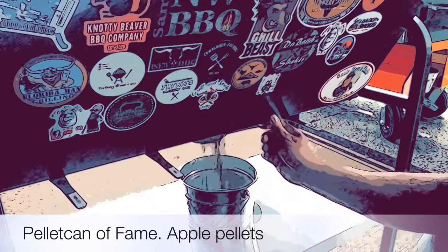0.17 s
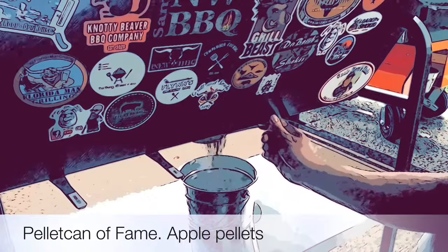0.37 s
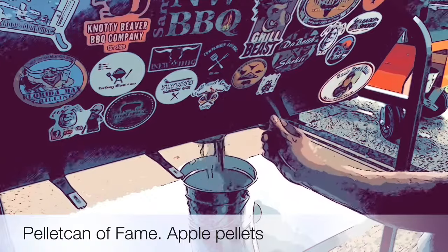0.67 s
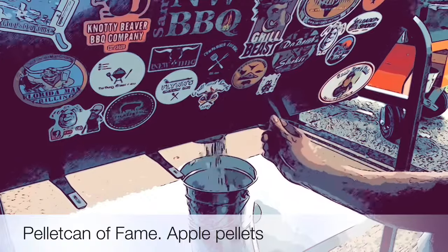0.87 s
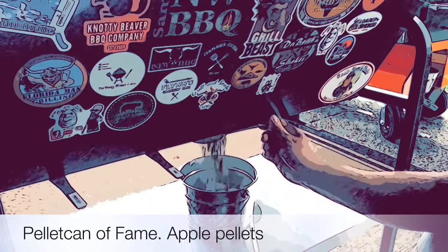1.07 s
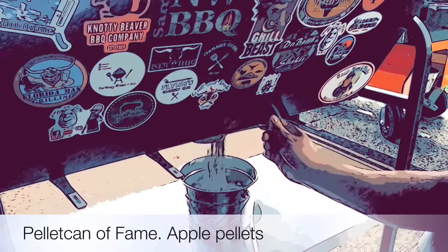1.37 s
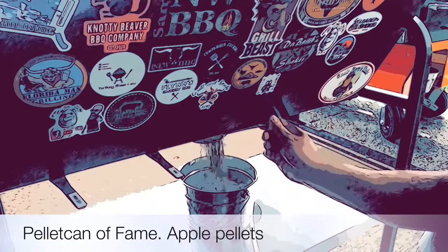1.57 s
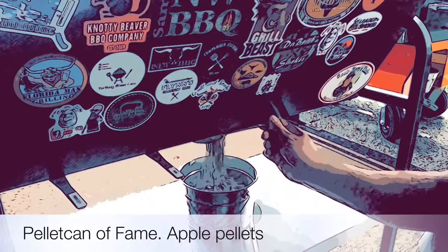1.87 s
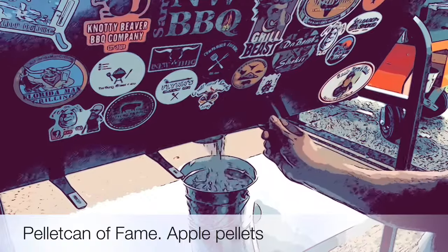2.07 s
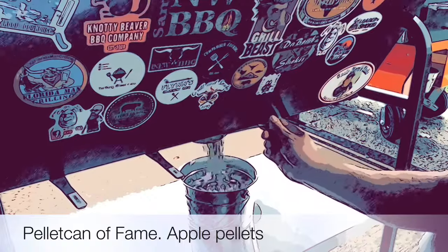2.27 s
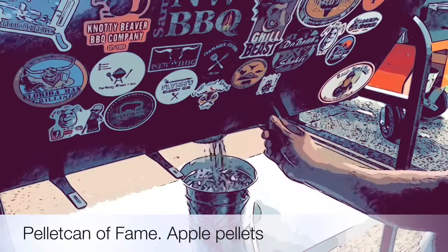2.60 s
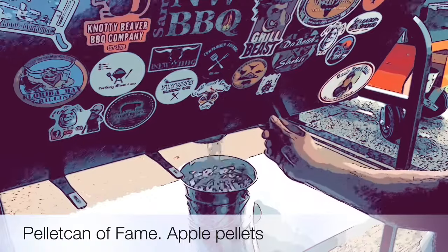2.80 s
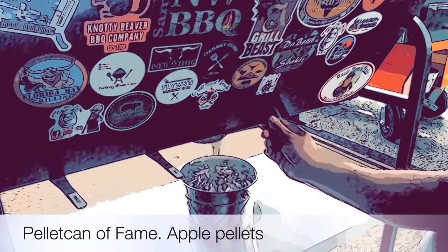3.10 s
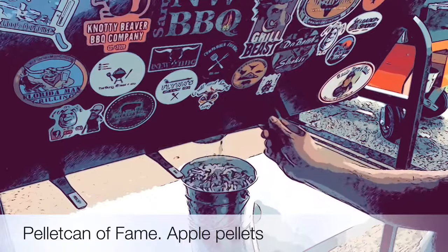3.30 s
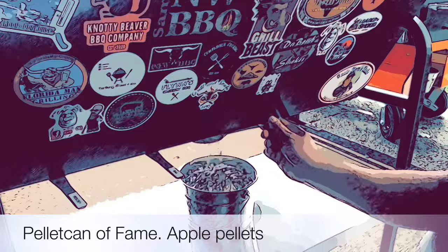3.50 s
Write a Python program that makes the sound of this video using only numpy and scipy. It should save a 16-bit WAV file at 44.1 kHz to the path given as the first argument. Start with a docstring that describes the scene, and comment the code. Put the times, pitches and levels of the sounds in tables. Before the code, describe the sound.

Close up outdoors, dry wood pellets drum on the bare floor of a sheet-metal can, then patter onto their own growing heap, ending in separate ticks with small rim rings and a soft low hum.

```python
"""Wood pellets poured into a metal can

Wood pellets pour from a chute into a sheet-metal can, close to a microphone that overloads at first.
The dense patter (random taps and short bursts of noise) thins out as the can fills. Louder pellets crack
singly (fading noise) and ring the rim; the wall and floor of the can answer with dying tones.
Faint, low outdoor noise lies underneath.
"""
import sys
import numpy as np
from scipy import signal
from scipy.fft import rfft, irfft, next_fast_len
from scipy.io import wavfile
from scipy.ndimage import uniform_filter1d

SR = 44100
rng = np.random.default_rng(int(sys.argv[2]) if len(sys.argv) > 2 else 0)


def ratio(d):
    """dB to gain"""
    e = np.asarray(d, float) / 20
    return 10 ** e


def store_pcm(level_fs):
    """Save levels as 16-bit WAV."""
    pcm = np.round(np.clip(level_fs, -1, 1) * 32767).astype(np.int16)
    wavfile.write(sys.argv[1], SR, np.atleast_2d(pcm).T)


N = 160965  # length in samples

# How the pouring goes: (time [s], patter level [dB], can body level [dB], brightness [0-1])
POURING = [(0, 0.5, -8.5, 0.37), (.12, -12.5, -16, 0.1), (.2, -14, -20.5, 0.06), (.31, -15.5, -22.5, 0.4),
           (.41, -19, -28, 0.11), (.55, -14, -26, 0.16), (.8, -18.5, -30.5, 0.4),
           (1.05, -19.5, -33.5, 0.48), (1.4, -21, -38.5, 0.55), (1.8, -22.5, -38.5, 0.52),
           (2.2, -28, -46.5, 0.58), (2.7, -30.5, -42.5, 0.42), (3.1, -33.5, -48.5, 0.53),
           (3.45, -36, -47.5, 0.54), (3.65, -41.5, -59, 0.2)]
# Basic tone colour of a crackling pellet: (frequency [Hz], relative level [dB per Hz])
PELLET_COLOUR = [(290, -36), (500, -23), (1930, -11.5), (3330, -2), (4900, -3.5), (8850, -2), (10200, -0.5),
                 (15500, -1.5)]
PATCHY_DB = 3.5  # typical unevenness of a burst's spectrum
BOUNCE_DB = 3.5  # typical unevenness of a sound's loudness over time


def evened(x):
    """Scales x to an average strength (rms) of 1."""
    return x / np.sqrt(np.mean(x ** 2) + 1e-20)


def spectrum_at(points, hz):
    """Reads a spectrum table at hz, along a logarithmic frequency scale."""
    table_hz, value = np.transpose(points)
    return np.interp(np.log(hz + 1), np.log(table_hz + 1), value)


def colour(x, points, centre_hz=None):
    """Filters x by a spectrum table, with an extra hump around centre_hz if one is given."""
    hump_db, hump_octaves = 5.5, 0.45
    size = next_fast_len(len(x))
    hz = np.fft.rfftfreq(size, 1 / SR)
    db = spectrum_at(points, hz)
    if centre_hz:
        octaves_away = np.log2((hz + 1) / centre_hz)
        db = db + hump_db * np.exp(-.5 * (octaves_away / hump_octaves) ** 2)
    return irfft(rfft(x, size) * ratio(db), size)[:len(x)]


def curve(rows, column):
    """Draws one column of a table as a line over time, a value per sample."""
    rows = np.array(rows)
    return np.interp(np.arange(N) / SR, rows[:, 0], rows[:, column])


def taps(per_s, spread_db):
    """Random single-sample impacts, up or down, most of them small and a few large."""
    strength = ratio(spread_db * np.minimum(rng.exponential(1, N), 3))
    happens = rng.random(N) < per_s / SR
    return strength * happens * rng.choice([-1, 1], N)


def lumps(shape, span):
    """Random numbers smoothed twice over span steps of the last axis, rms 1 overall."""
    smooth = uniform_filter1d(rng.standard_normal(shape), span)
    return evened(uniform_filter1d(smooth, span))


def patchy(noises):
    """Gives each row of noise its own uneven spectrum; span is how many frequency bins a patch covers."""
    rows, length = noises.shape
    span = 12 if length == 2048 else 45
    return irfft(rfft(noises) * ratio(PATCHY_DB * lumps((rows, length // 2 + 1), span)))


def ring(modes, t, change_db):
    """Adds up dying tones, one for each way the metal vibrates, each made louder or softer by change_db."""
    hz, db, t60 = np.transpose(modes)[:, :, None]
    strength = ratio(db + change_db[:, None] - 60 * t / t60)
    return (strength * np.sin(2 * np.pi * hz * t)).sum(0)


def add(mix, s, sound):
    """Mixes a sound in, starting at s seconds."""
    part = mix[round(s * SR):][:len(sound)]
    part += sound[:len(part)]


def patter():
    """Many small pellets in loose clusters: each tap starts one of sixteen rattling noise bursts."""
    # patter on bare metal: (frequency [Hz], relative level [dB per Hz])
    metal_colour = [(180, -14.5), (300, -11), (384, -3.5), (509, -17), (620, -14), (1220, -5.5), (3180, 3),
                    (3940, 4), (5660, 2.5), (8990, -7.5), (15500, -9)]
    # patter on the heap of pellets: (frequency [Hz], relative level [dB per Hz])
    heap_colour = [(180, -6.5), (300, -10), (1220, -11.5), (2040, -9.5), (3630, 0.5), (4800, -8.5),
                   (8140, 7), (9290, 8.5), (10600, 5.5), (13600, 13), (15500, -42)]
    taps_per_s, spread_db, gaps_db = 1100, 2.5, 1.5
    base_t60_s, t60_octaves = 0.041, .9  # a t60 is the time to fade by 60 dB
    t, kinds = np.arange(2048) / SR, range(16)
    kind = rng.integers(0, len(kinds), N)
    hits = taps(taps_per_s, spread_db) * ratio(gaps_db * lumps(N, span=500))
    bursts = patchy(rng.standard_normal((len(kinds), len(t))))
    t60s = base_t60_s * 2 ** (t60_octaves * np.linspace(-2, 1, len(kinds)))
    rattle = np.zeros(N)
    for k in kinds:
        rattle += signal.oaconvolve(hits * (kind == k), bursts[k] * ratio(-60 * t / t60s[k]))[:N]
    on_heap = np.clip(curve(POURING, 3), 0, 1)
    on_metal = 1 - on_heap
    blend = on_metal * evened(colour(rattle, metal_colour)) + on_heap * evened(colour(rattle, heap_colour))
    return ratio(curve(POURING, 1)) * blend


def clumps():
    """Pellets landing together: swells of uneven noise that rise more quickly than they fall."""
    # the clumps: (centre time [s], level [dB], half length [s], centre frequency [Hz])
    landings = [(0.03, -1.5, 0.089, 2680), (0.192, -11.5, 0.016, 3020), (0.366, -12.5, 0.0054, 6040),
                (0.548, -8.5, 0.036, 4270), (.67, -11, 0.013, 4940), (0.764, -14, 0.037, 5200),
                (0.827, -19, 0.039, 5000), (0.839, -11.5, 0.034, 4970), (0.892, -12.5, 0.01, 2980),
                (0.933, -6, 0.012, 5700), (0.966, -12.5, 0.017, 5970), (1.012, -19, 0.015, 3100),
                (1.098, -11.5, 0.01, 5000), (1.123, -8.5, 0.015, 5960), (1.251, -10.5, 0.02, 6300),
                (1.3, -13.5, 0.01, 5700), (1.425, -6, 0.0095, 5400), (1.548, -16, 0.013, 5960),
                (1.685, -15, 0.018, 5840), (2.382, -17, 0.015, 5960), (2.424, -18, 0.0056, 8050),
                (2.528, -11.5, 0.0061, 4740), (2.701, -12, 0.016, 7500), (3.036, -24, 0.018, 3700),
                (3.101, -20.5, 0.014, 7700), (3.64, -27, .008, 4000)]
    out = np.zeros(N)
    crackle = ratio(BOUNCE_DB * lumps(N, span=40)) * rng.standard_normal(N)
    for s, db, half, hz in landings:
        first = max(round((s - 2 * half) * SR), 0)
        last = min(round((s + 3 * half) * SR), N)
        at = np.arange(first, last)
        swell = np.exp(-((at / SR - s) / half) ** 2 * np.where(at / SR < s, 2, 1))
        add(out, at[0] / SR, ratio(db) * swell * evened(colour(crackle[at], PELLET_COLOUR, hz)))
    return out


def wall(impacts):
    """The upper can wall: every impact sets off the same dying tones, strongest while it is half full."""
    # tones of the upper wall: (frequency [Hz], relative level [dB], t60 [s])
    wall_modes = [(2310, -5, .06), (2538, -5, .1), (2785, -2, .08), (2990, -4, .04), (3080, 0, .06),
                  (3330, -7, .04)]
    # how strongly the wall answers the impacts: (time [s], level [dB])
    wall_share = [(0, -16), (.6, -15), (.9, -8), (1.5, -11), (2.2, -16), (3.65, -15)]
    tones = ring(wall_modes, np.arange(SR // 4) / SR, np.zeros(len(wall_modes)))
    drive = impacts * ratio(curve(wall_share, 1))
    return signal.oaconvolve(drive, tones / np.linalg.norm(tones))[:N]


def body():
    """The stream drums the can at six spots, each with its own mix of tones; the lowest tone booms on."""
    # tones of the can body: (frequency [Hz], relative level [dB], t60 [s])
    body_modes = [(416, -15, 0.087), (514.5, -11, 0.037), (587.6, -1.5, 0.038), (630, -4.5, 0.072),
                  (684, -5.5, 0.088), (760, -4, 0.047), (833, 0.5, 0.018), (949, -5, 0.057),
                  (1134, -11.5, 0.11), (1454, -5, 0.066), (1831, 1.5, 0.027)]
    # loudness of the lowest can tone: (time [s], level [dB])
    boom_level = [(0, -49), (.04, -32), (.12, -26.5), (.35, -34.5), (.85, -39), (.9, -45.5), (1.2, -46.5),
                  (1.3, -37), (1.43, -42), (1.5, -46.5), (2.3, -50.5), (3.5, -48.5), (3.65, -73)]
    taps_per_s, spread_db, rise_s = 550, 3.5, 0.0021
    boom_hz, boom_t60_s = 261, .5
    t, spots = np.arange(SR // 3) / SR, range(6)
    spot, hits = rng.integers(0, len(spots), N), taps(taps_per_s, spread_db)
    drumming = np.zeros(N)
    for k in spots:
        tones = ring(body_modes, t, 3 * rng.standard_normal(len(body_modes)))
        drumming += signal.oaconvolve(hits * (spot == k), np.minimum(t / rise_s, 1) * tones)[:N]
    boom = signal.oaconvolve(hits, ring([(boom_hz, 0, boom_t60_s)], t, np.zeros(1)))[:N]
    # even out the boom's own ups and downs, so that the table sets its loudness
    boom = boom / np.sqrt(uniform_filter1d(boom ** 2, 1500) + 0.048 * np.mean(boom ** 2))
    return ratio(curve(POURING, 2)) * evened(drumming) + ratio(curve(boom_level, 1)) * boom


def hum():
    """Distant low outdoor noise: filtered noise, slightly wide, swelling slowly."""
    # tone colour of the outdoor noise: (frequency [Hz], relative level [dB per Hz])
    hum_colour = [(12, -38), (20, 5), (48, -4), (96, 2.5), (181, 1.5), (270, -5), (335, -0.5), (566, -8),
                  (1250, -10), (1500, -4), (1950, -26), (3300, -120)]
    # slow swelling: (time [s], level [dB])
    hum_swell = [(0, 7.5), (1.3, -4), (2.1, 3), (3, 0), (3.65, -3)]
    base_db, side_db = -42.5, -25  # side: the left-right difference against the middle
    mid, side = (evened(colour(noise, hum_colour)) for noise in rng.standard_normal((2, N)))
    return ratio(base_db + curve(hum_swell, 1)) * (mid + ratio(side_db) * side * np.array([[1], [-1]]))


def cracks():
    """Each loud pellet: a sharp burst of patchy noise, uneven bounces on the heap and a ring of the rim."""
    # the loud pellets: (time [s], relative level [dB], centre frequency [Hz], rim ring level [dB])
    loud_pellets = [(0.1789, 4, 3280, -1.5), (0.251, 3, 5040, -12), (0.315, -22, 2720, -21),
                    (0.3394, 2, 3280, -2.5), (0.434, -7, 2370, -18), (0.4796, -1, 3030, -25.5),
                    (0.528, -1, 5060, -8), (0.6468, -2, 5800, -18), (0.69, -1.5, 4800, -2),
                    (0.7193, 2, 8250, -15), (0.7492, 7.5, 5560, -36), (0.812, 1, 4500, -14),
                    (0.8675, -6, 2980, -18), (0.879, 3.5, 3100, -20), (0.927, -19, 8310, -15),
                    (0.961, 1.5, 7300, -14), (1.0889, -4.5, 6000, -21), (1.2151, -0.5, 8750, -21),
                    (1.2484, 1.5, 6550, -15), (1.294, -4, 6340, -13), (1.3039, 2, 5800, -18),
                    (1.369, -1, 3170, -18), (1.4233, -18, 6200, -23), (1.47, -2.5, 6570, -16),
                    (1.535, -13, 2560, -21), (1.5525, 1, 5700, -19), (1.5998, -2, 6480, -18),
                    (1.6199, -2, 6510, -10), (1.6678, -4.5, 5930, -15), (1.717, -3, 6460, -25),
                    (1.753, -7, 6550, -18), (1.7747, -3.5, 6250, -14), (1.8054, 1, 6200, -10),
                    (1.8447, 0.5, 7210, -29), (1.886, -10.5, 6050, -22), (1.9143, -6, 6380, -20),
                    (1.948, -5, 9000, -34), (1.9752, -4.5, 7510, -32), (2.004, -10, 4310, -18),
                    (2.018, -4, 7550, -7), (2.0857, -9, 7160, -20), (2.0996, 0.5, 7200, -30),
                    (2.1108, -3.5, 8540, -26), (2.14, -4, 8400, -22), (2.1831, 0.5, 4800, -23),
                    (2.2034, -7.5, 8790, -25), (2.2355, -4, 6960, -22), (2.254, -7, 8980, -24),
                    (2.294, -10.5, 8970, -25), (2.3131, -13, 7890, -21), (2.3473, 0, 8160, -22),
                    (2.372, -8, 9040, -18), (2.414, 0, 8970, -26), (2.486, -4, 8800, -35),
                    (2.5196, 0, 8550, -13), (2.571, -11, 2850, 0), (2.635, -14, 3080, -20),
                    (2.651, -3.5, 5100, -3), (2.6927, -3.5, 3880, 0), (2.7395, -0.5, 6560, -30),
                    (2.774, -28, 2300, -20), (2.7828, -11, 8690, -22), (2.815, -20, 6350, -18),
                    (2.8308, -4, 7400, -28), (2.8487, -8, 8500, -16), (2.8784, -11, 8500, -20),
                    (2.8931, -4.5, 4000, -4), (2.9372, -5.5, 7140, -12), (2.989, -12, 8100, 3),
                    (3.0137, -5.5, 3960, -8), (3.064, -14, 4180, 5), (3.0991, -7.5, 3930, -1),
                    (3.1353, -15, 2800, -15), (3.155, -15, 8070, -18), (3.2185, -13, 5670, -15),
                    (3.249, -6, 8600, -22), (3.272, -14.5, 3670, -1.5), (3.3334, -7.5, 4060, -5),
                    (3.3803, -13, 4500, -20), (3.4159, -11, 2770, 5), (3.4945, -24, 4500, -20),
                    (3.515, -12.5, 5160, 6), (3.5387, -5.5, 4200, 3.5), (3.6076, -14.5, 2820, -12),
                    (3.6235, -12, 7640, -12)]
    # tones of the rim: (frequency [Hz], relative level [dB], t60 [s])
    rim_modes = [(3600, -7, .04), (3700, -1, .06), (4086, -7, .12), (4323, -9, .12), (5050, -6, .04)]
    tick_db, tick_t60_s, crack_t60_s = 1, .005, .034
    tail_db, tail_t60_s, rise_s = -10.5, 0.17, 0.00035
    rim_detune, rim_db_per_octave = .008, 40  # rim tones far from a pellet's centre ring less
    out, t = np.zeros(N), np.arange(8192) / SR
    noises = patchy(rng.standard_normal((len(loud_pellets), len(t))))
    bounces = ratio(BOUNCE_DB * lumps(noises.shape, span=60))
    scatters = rng.standard_normal((len(loud_pellets), len(rim_modes) + 1))
    for (s, db, hz, rim_db), noise, bounce, scatter in zip(loud_pellets, noises, bounces, scatters):
        tick = ratio(tick_db - 60 * t / tick_t60_s)
        tail = bounce * ratio(tail_db - 60 * t / tail_t60_s)
        fade = tick + ratio(-60 * t / crack_t60_s) + tail
        far_db = rim_db_per_octave * abs(np.log2(np.array(rim_modes)[:, 0] / hz))
        rim_change_db = 3 * scatter[1:] - far_db + far_db.min()
        rim = ring(rim_modes, t * (1 + rim_detune * scatter[0]), rim_change_db)
        burst = evened(colour(noise, PELLET_COLOUR, hz)) * fade + ratio(rim_db) * rim
        add(out, s, ratio(db - 10.5) * np.minimum(t / rise_s, 1) * burst)
    return out


def knocks():
    """Hollow thumps on the can floor: a short tone with five softer ones scattered around its pitch."""
    # the knocks: (time [s], relative level [dB], centre frequency [Hz])
    floor_hits = [(0.262, -9, 630), (0.319, -10, 594), (0.433, -5, 664), (0.778, -12.5, 660),
                  (0.809, -16.5, 697), (0.879, -10.5, 1550), (1.416, -21, 1800), (2.185, -26, 1680),
                  (3.415, -18, 1490)]
    t60_cycles, spread_octaves, rise_s = 21, 0.52, 0.0011
    out, t = np.zeros(N), np.arange(3000) / SR
    for (s, db, hz), row in zip(floor_hits, rng.standard_normal((len(floor_hits), 5))):
        around_hz = hz * 2 ** (spread_octaves * row[:, None])
        thump = np.sin(2 * np.pi * hz * t) + .5 * np.sin(2 * np.pi * around_hz * t).sum(0)
        fade = ratio(db - 2.5 - 60 * t * hz / t60_cycles)
        add(out, s, fade * np.minimum(t / rise_s, 1) * thump)
    return out


def scene():
    """All sources together; the landing pellets also drive the wall."""
    impacts = patter() + clumps() + cracks()
    return impacts + wall(impacts) + body() + knocks() + hum()


def low_pass(x):
    """Removes everything above the highest recorded frequency."""
    return signal.sosfilt(signal.butter(12, 15660, fs=SR, output="sos"), x)


def record(dry):
    """The microphone colours the sound and flattens any peak beyond full scale."""
    # microphone response: (frequency [Hz], level [dB])
    mic_response = [(20, -5), (120, -5), (190, -7), (240, -0.5), (9300, 2), (10000, -7.5), (13600, -7),
                    (14300, -15.5), (15700, -13), (16200, -40)]
    heard = np.array([colour(side, mic_response) for side in dry])
    overloaded = np.clip(heard, -1, 1)
    return low_pass(overloaded)


dry = scene()
out = record(dry)
store_pcm(out)
```